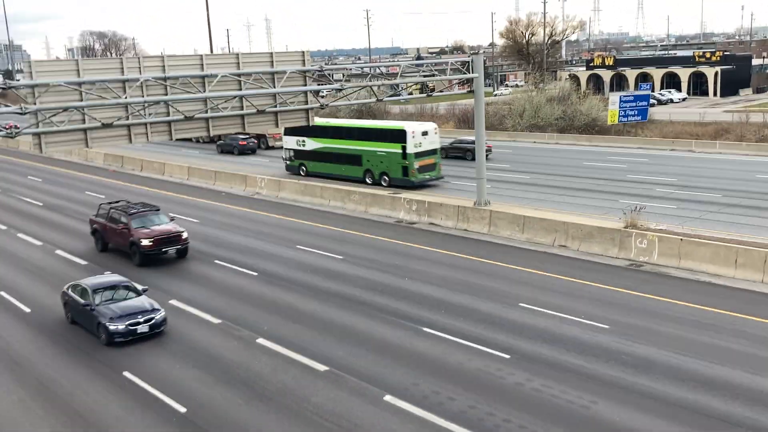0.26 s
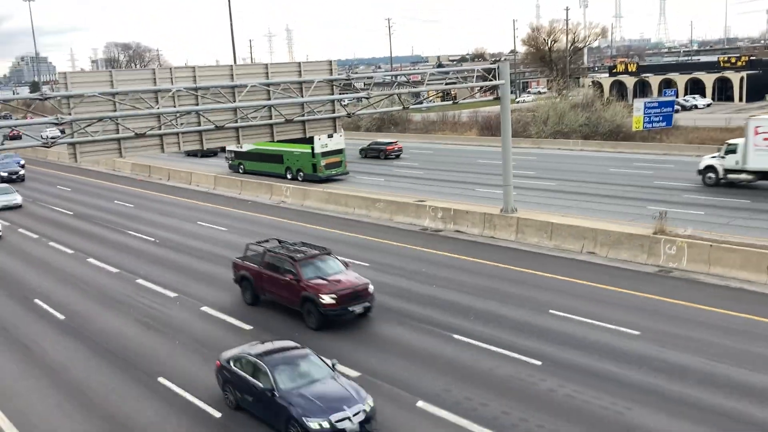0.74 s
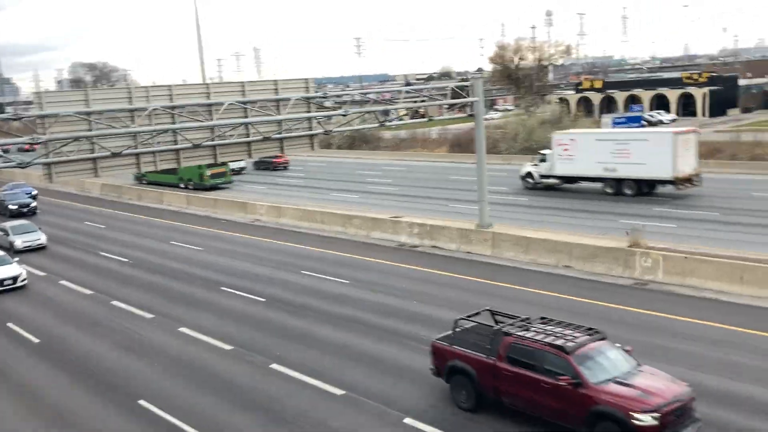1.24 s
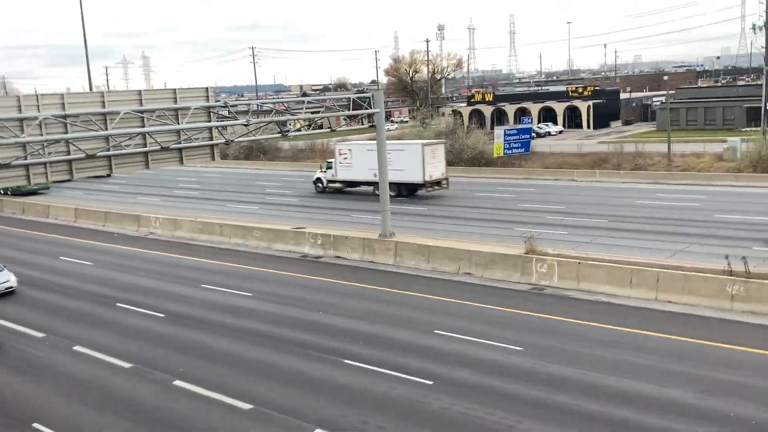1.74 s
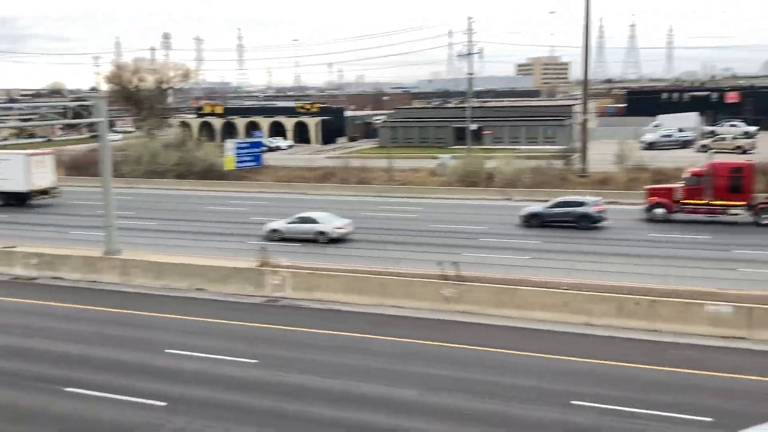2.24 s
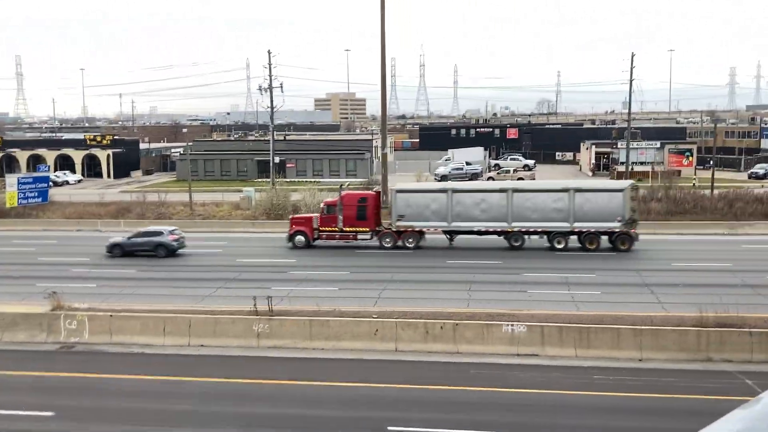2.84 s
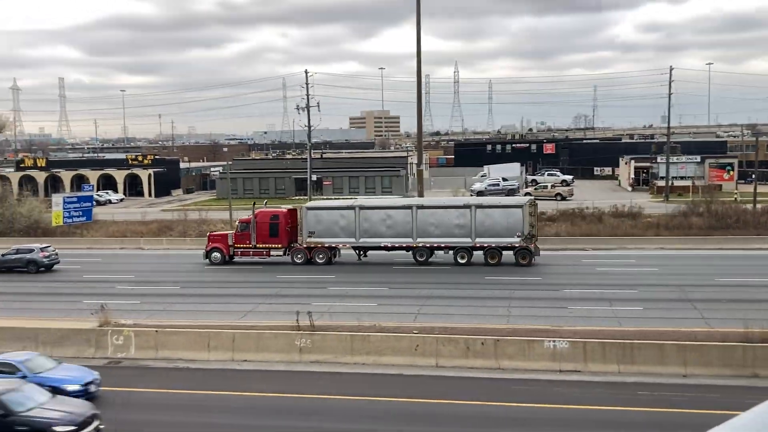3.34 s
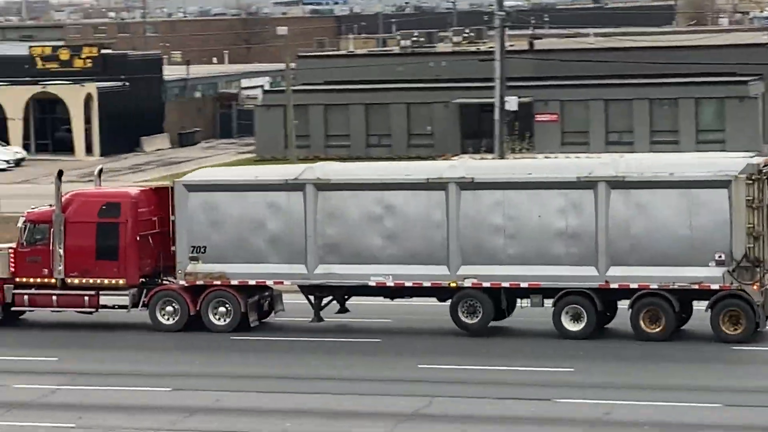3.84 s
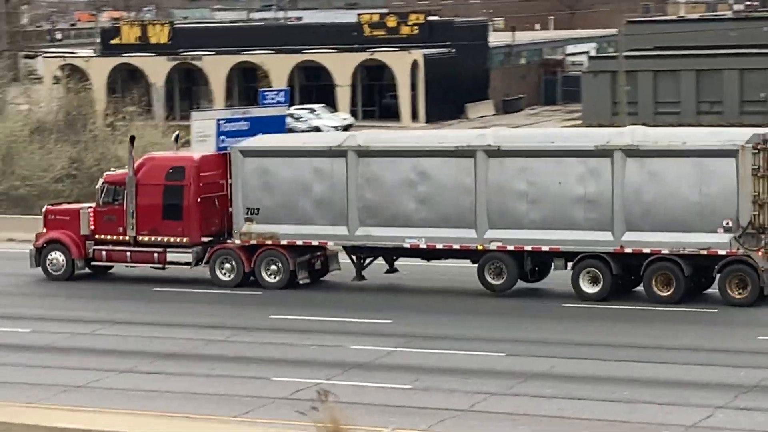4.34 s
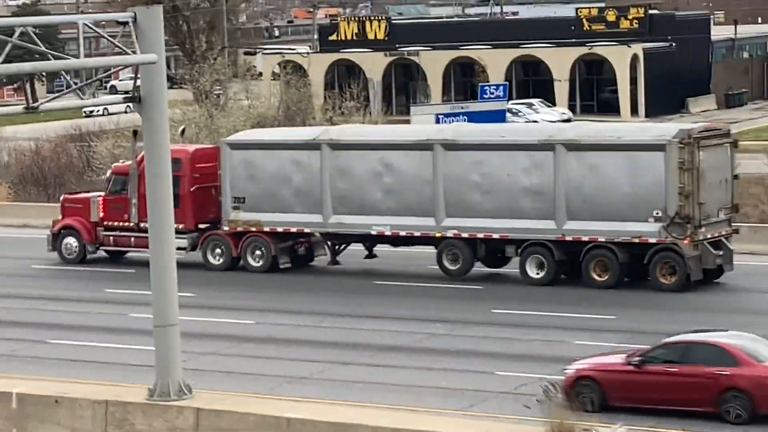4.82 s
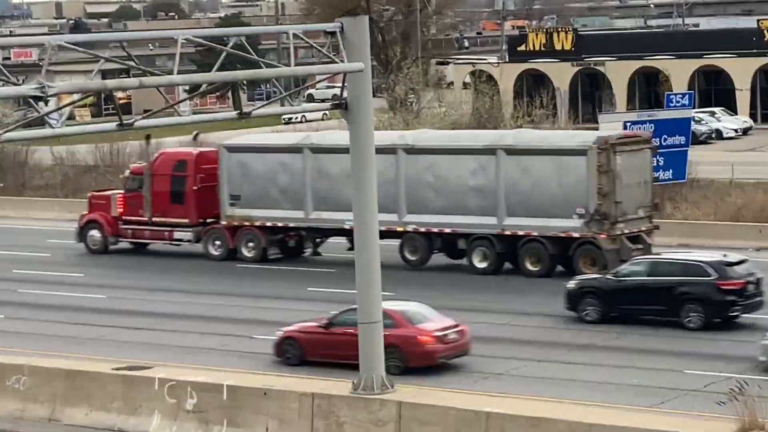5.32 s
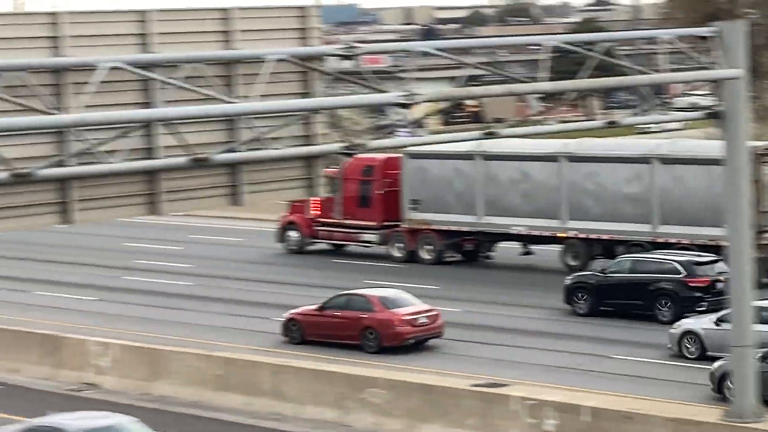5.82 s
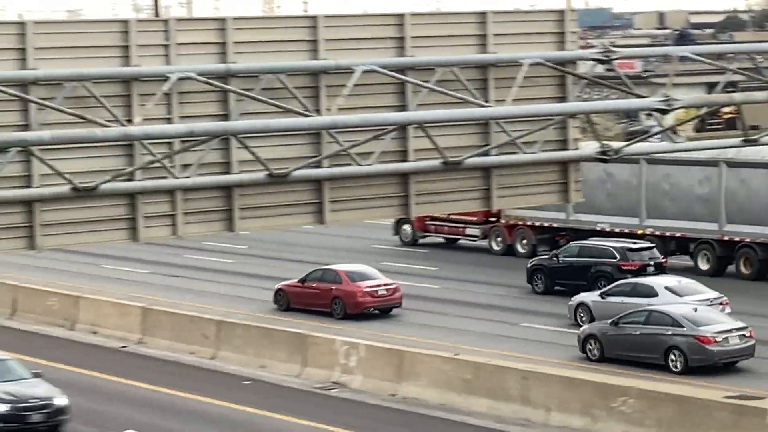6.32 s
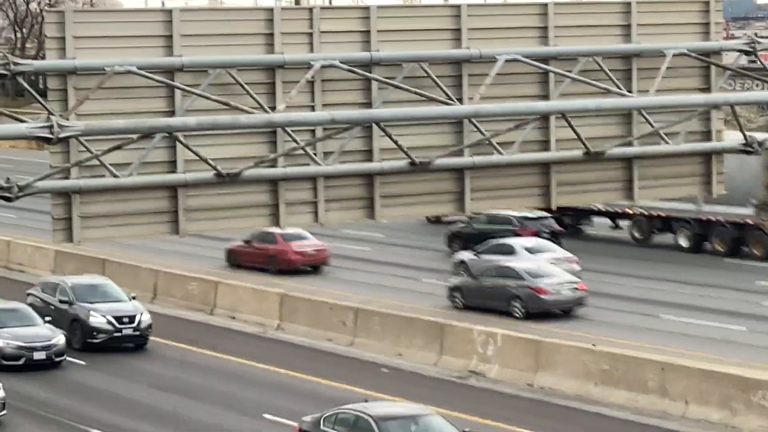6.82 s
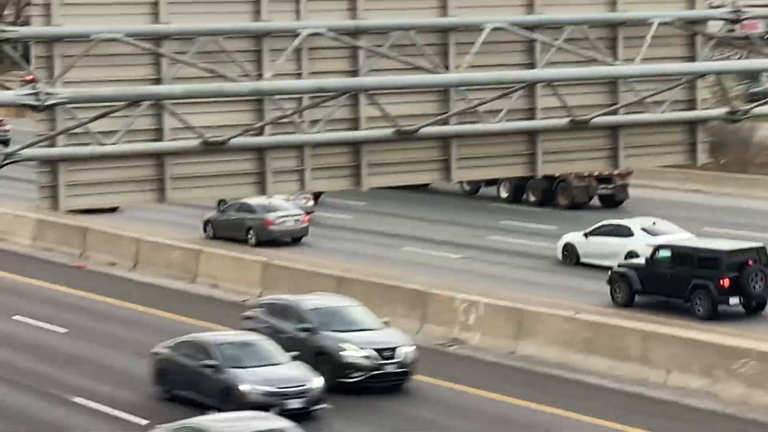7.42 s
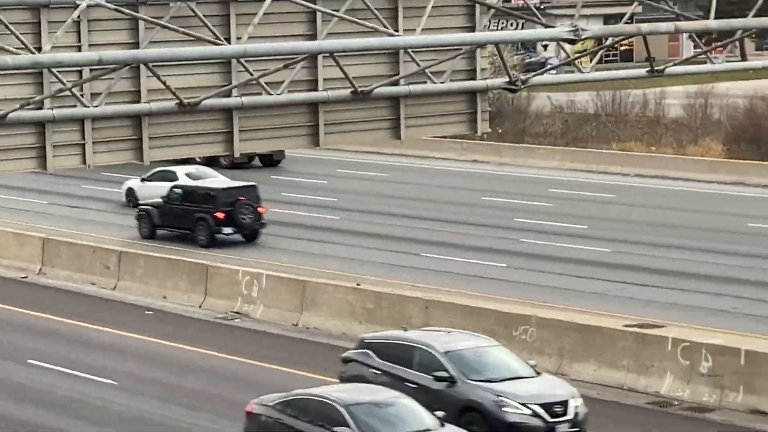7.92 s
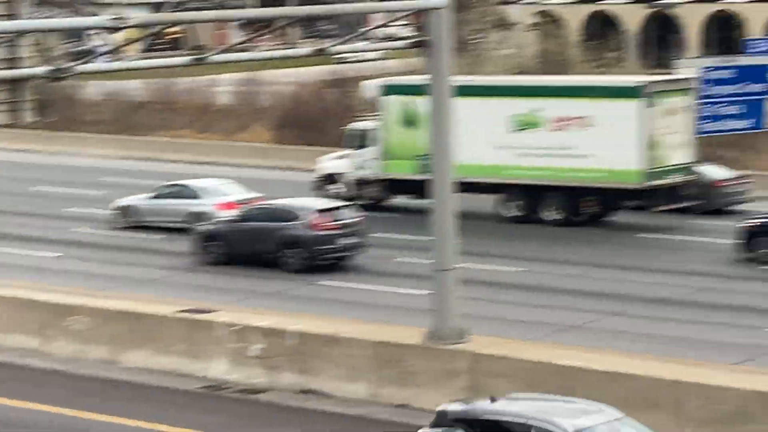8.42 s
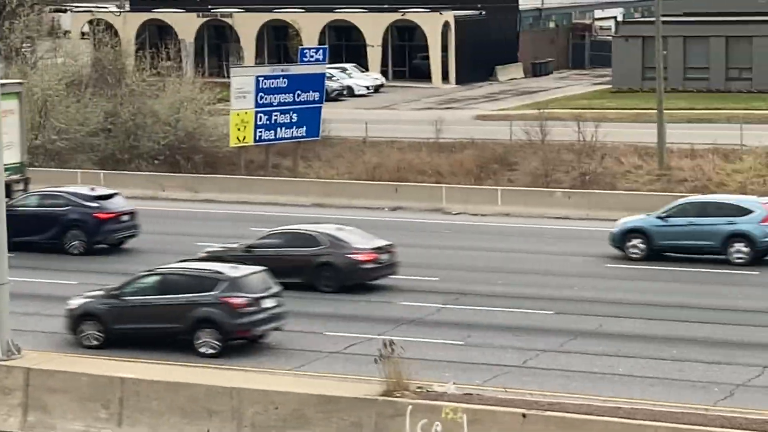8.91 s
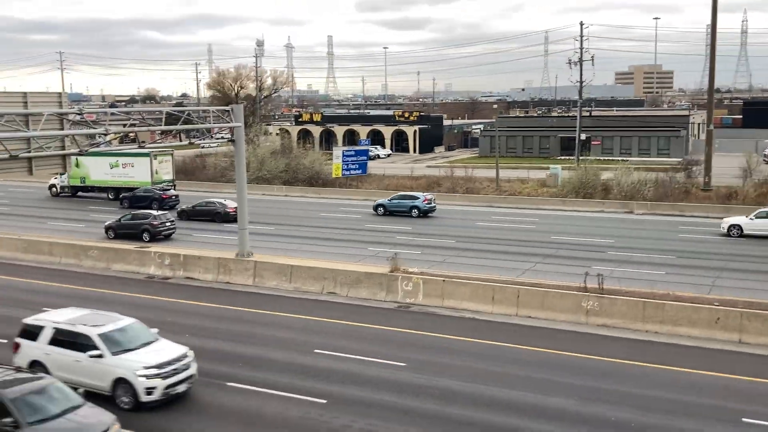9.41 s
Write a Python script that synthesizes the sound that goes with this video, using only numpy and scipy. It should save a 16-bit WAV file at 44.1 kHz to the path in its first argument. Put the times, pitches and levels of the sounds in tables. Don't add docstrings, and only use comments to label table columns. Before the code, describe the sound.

Many tyres hiss and drone along a wide highway while wind buffets the microphone, with crackling ticks and heavy low thumps.

```python
import sys
import numpy as np
from scipy import signal
from scipy.fft import rfft, irfft, next_fast_len
from scipy.io import wavfile
from scipy.ndimage import uniform_filter1d, minimum_filter1d

SR = 44100
rng = np.random.default_rng(int(sys.argv[2]) if len(sys.argv) > 2 else 0)


def generate_wav(sig):
    pcm = np.round(np.clip(np.atleast_2d(sig).T, -1, 1) * 32767).astype(np.int16)
    wavfile.write(sys.argv[1], SR, pcm)


def convert_level_to_amplitude(level_db):
    exponent = np.asarray(level_db, float) / 20
    return 10 ** exponent


N = 426006
TIME = np.arange(N) / SR
SIZE = next_fast_len(N + 8192)
FREQ = np.maximum(np.arange(SIZE // 2 + 1) * SR / SIZE, 1.)
LOG_FREQ = np.log(FREQ)

# (time [s], push [dB], turbulence [dB])
GUST = [(0.0, -16.5, -48), (0.67, -30, -54), (1.62, -22.5, -48), (2.0, -25.5, -62), (3.2, -21.5, -55.5),
        (3.4, -20, -40.5), (3.65, -20.5, -51.5), (4.15, -11, -36), (4.5, -18.5, -47), (5.45, -21, -52.5),
        (6.13, -16.5, -40.5), (6.35, -24, -52.5), (6.97, -24, -55.5), (7.3, -17, -37), (7.45, -29, -55.5),
        (8.35, -28.5, -56.5), (9.2, -15, -37), (9.66, -24, -44)]


def along(table):
    s, *columns = np.transpose(table)
    return [np.interp(TIME, s, column) for column in columns]


def across(table):
    hz, value = np.transpose(table)
    return np.interp(LOG_FREQ, np.log(np.maximum(hz, 1.)), value)


def shape(x, response):
    return irfft(rfft(x, SIZE) * response, SIZE)[..., :N]


def colour(table):
    gain = convert_level_to_amplitude(across(table))
    return gain / np.sqrt(np.mean(gain ** 2))


def peak_one(response):
    return response / np.max(np.abs(irfft(response, SIZE)))


def bell(length_s):
    return np.exp(-(np.pi * FREQ * length_s) ** 2) * length_s * SR * np.sqrt(np.pi)


def unit(x):
    return x / np.sqrt(np.mean(x ** 2))


def white():
    return rng.standard_normal(N)


def walk(rate_hz):
    hold = int(SR / rate_hz)
    held = np.repeat(rng.standard_normal(N // hold + 1), hold)
    slewed = uniform_filter1d(uniform_filter1d(held, hold), hold)[:N]
    return slewed / np.std(slewed)


def lumpy(depth_db, rate_hz):
    return unit(white() * convert_level_to_amplitude(depth_db * walk(rate_hz)))


def spikes(times_s, sizes):
    x = np.zeros(N)
    np.add.at(x, np.clip((times_s * SR).astype(int), 0, N - 1), sizes)
    return x


def swell(times_s, half_s, sizes):
    coarse = TIME[::64]
    humps = 0
    for t, half, size in zip(times_s, half_s, sizes):
        humps = humps + size * np.exp(-((coarse - t) / max(half, .005)) ** 2)
    return np.interp(TIME, coarse, humps)


def wide(make, lean):
    # (frequency [Hz], side minus mid [dB])
    width = [(450, -95), (600, -69.5), (780, -27), (1100, -9), (1600, -4), (2600, 2), (4000, -1),
             (7000, -1)]
    mid, other = make(), make()
    side = shape(other + lean * mid, convert_level_to_amplitude(across(width)))
    return np.array([mid + side, mid - side])


def ports(x):
    # (frequency [Hz], left port leads [rad])
    lead_rad = [(0, 0), (1030, 0.1), (1980, -0.6), (3010, 2.7), (4390, -0.7), (5170, -3.2), (5940, -4.3),
                (6550, -6.2), (7490, -6.5), (7920, -7.9), (9560, -9.9), (10900, -12.2), (12200, -13.0),
                (12500, -13.9), (15800, -6 * np.pi)]
    turn = np.exp(.5j * across(lead_rad) * (FREQ > 2500))
    return np.array([shape(x, turn), shape(x, np.conj(turn))])


def chirp(turns=0.9096):
    return np.exp(-2j * np.pi * turns * np.log2(np.clip(FREQ, 40, 3000) / 3000))


def road():
    # (time [s], traffic flow [dB], closeness of the nearest tyres [dB])
    traffic = [(0.0, -28.5, -11), (0.73, -30, -2.5), (1.32, -27, -11.5), (1.72, -26, -12), (2.3, -31.5, -9),
               (2.91, -31, -4), (3.95, -29.5, -4), (4.49, -29.5, -5), (4.87, -27, -3), (5.24, -31, -4),
               (5.57, -25, -7), (5.89, -33, -3.5), (6.54, -28, -1.5), (7.3, -27, -5), (7.91, -26, -3.5),
               (8.74, -29, -0.5), (9.66, -31, -5)]
    # (time [s], level at the closest point [dB], time to fade by 3 dB [s])
    trucks = [
        (0.0, -35, -1.5),
        (1.4, -27.5, .5),
        (2.7, -34, 0.9),
        (4.05, -32.5, 0.32),
        (4.87, -39, 0.5),
        (6.0, -33.5, -1.8),
        (7.9, -32, 0.8),
        (9.3, -21.5, 0.1),
    ]
    # (frequency [Hz], density [dB/Hz])
    roar_spectrum = [(400, -51), (560, -14.5), (660, -0.5), (850, 0), (1000, -11.5), (1250, -24),
                     (1600, -22), (2600, -120)]
    hiss_spectrum = [(590, -9), (1000, 2.5), (1600, -8), (1980, -4.5), (2280, -7.5), (2800, -10),
                     (3480, -36), (5130, -57.5), (7500, -70), (9750, -90), (16500, -120)]
    drone_spectrum = [(200, -69), (300, -11.5), (450, -8.5), (600, 1), (680, -3.5), (900, -61.5),
                      (1200, -120)]

    flow_db, close_db = along(traffic)
    power = sum(convert_level_to_amplitude(db) ** 2 / (1 + ((TIME - s) / fade_s) ** 2) for s, db, fade_s in trucks)
    drone_db = 10 * np.log10(power) + 1.6 * walk(5.7)
    roar_db = flow_db + .5 * walk(9.3) + 1.0
    hiss_db = flow_db + close_db + walk(12) - 0.1

    def tyres():
        roar = convert_level_to_amplitude(roar_db) * shape(lumpy(0.34, 40), colour(roar_spectrum))
        hiss = convert_level_to_amplitude(hiss_db) * shape(lumpy(2.47, 60), colour(hiss_spectrum))
        return roar + hiss

    drone = convert_level_to_amplitude(drone_db) * shape(lumpy(1.6, 35), colour(drone_spectrum))
    return drone + wide(tyres, 0.067)


def ticks(per_s=240, scatter_db=7.5, length_s=0.00041):
    # (time [s], peak above 8 kHz [dB], body at 3-7
    # kHz [dB])
    loud_ticks = [(0.129, -38, -32.5), (0.1645, -33.5, -41.5), (0.267, -44, -49), (0.2896, -32.5, -43),
                  (0.3384, -38, -43), (0.362, -31, -42.5), (0.3708, -31.5, -45.5), (0.398, -34, -45),
                  (0.4212, -30.5, -49.5), (0.5282, -42, -51), (0.545, -36.5, -50), (0.5766, -43, -53.5),
                  (0.6536, -39, -49.5), (0.6873, -41, -48.5), (0.7997, -46, -54), (0.8, -40, -47.5),
                  (0.83, -51, -50), (0.836, -45, -47), (0.8719, -48, -47), (0.89, -42, -49),
                  (1.165, -37, -47.5), (1.047, -45, -45), (1.072, -37, -43), (1.098, -39, -48),
                  (1.098, -29.5, -51), (1.1443, -47, -52), (1.1445, -31.5, -51), (1.1984, -32, -41),
                  (1.1997, -28.5, -42.5), (1.25, -31, -42.5), (1.257, -25, -51), (1.273, -20, -44.5),
                  (1.317, -37, -57.5), (1.3488, -41, -56), (1.366, -40, -52.5), (1.39, -47.5, -44.5),
                  (1.225, -35, -50), (1.29, -40, -49), (1.4555, -37, -46), (1.5085, -41, -53),
                  (1.51, -41.5, -46), (1.514, -34, -44.5), (1.533, -27.5, -35), (1.579, -38.5, -39.5),
                  (1.601, -35, -48), (1.6183, -25, -40), (1.636, -30.5, -35), (1.732, -37, -51),
                  (1.8336, -47, -49), (1.8532, -44, -47.5), (1.8532, -41, -46), (1.913, -36, -43),
                  (1.9109, -33, -36.5), (1.963, -47, -44.5), (1.9626, -33, -48), (2.16, -30, -35.5),
                  (2.259, -33, -43.5), (2.2817, -46, -63), (2.3301, -44, -57), (2.37, -40, -65),
                  (4.2027, -33, -23), (4.2222, -43, -23.5), (4.2424, -50, -30), (4.284, -34, -23.5),
             (4.332, -43, -38), (4.3697, -49, -37.5), (4.4197, -32.5, -28.5), (4.4677, -42, -37),
             (4.501, -51.5, -51), (4.5208, -45, -41.5), (4.5599, -47, -40), (4.56, -44, -38.5),
             (4.578, -41, -32), (4.6072, -37, -32), (4.6091, -27, -30), (4.627, -40.5, -37),
             (4.6478, -48, -40), (4.661, -39, -35), (4.7017, -46, -45.5), (4.723, -38, -40.5),
             (4.8172, -38, -26.5), (4.84, -44, -45), (4.846, -45, -36.5), (4.887, -33, -28.5),
             (4.92, -34, -28.5), (4.943, -44, -30), (4.9859, -53, -34), (5.036, -44, -23),
             (5.0356, -25, -23), (5.062, -17.5, -11), (5.156, -59, -45), (5.1877, -52, -52),
             (5.343, -55, -53), (5.398, -55, -52), (5.4214, -54, -41), (5.534, -34, -27.5),
             (5.606, -42, -30), (5.605, -27.5, -27), (5.696, -30.5, -33), (5.772, -52, -31),
             (5.91, -54, -38), (5.9402, -53, -34), (5.94, -45, -27.5), (6.1255, -51, -32),
             (6.1518, -50, -42),
                  (6.154, -50, -37.5), (6.1864, -17, -20), (7.32, -34, -32), (6.2322, -28.5, -33),
              (6.2581, -34, -37), (6.2998, -36, -41), (7.089, -38, -48), (6.3404, -36, -53),
              (6.3608, -30.5, -39), (6.4465, -47, -46), (6.4707, -38, -48.5), (6.4901, -43, -51.5),
              (6.788, -28, -46), (6.534, -46, -58), (6.635, -37, -50), (6.6563, -34, -44),
              (6.679, -42, -49), (6.7243, -34, -46), (6.7477, -31, -43.5), (6.7802, -16.5, -40),
              (6.8052, -25, -45.5), (6.8298, -39, -46.5), (6.908, -33, -39.5), (6.864, -30, -47),
              (6.8816, -25, -35), (6.931, -36, -39), (6.952, -44, -55.5), (6.9904, -42, -40),
              (6.9993, -29, -44), (7.029, -42, -49.5), (7.0635, -39, -44.5), (7.078, -39, -48),
              (7.1, -40, -49), (7.1226, -32, -38), (7.14, -26, -39.5), (7.1512, -20, -41),
              (7.1728, -27, -31.5), (7.2088, -19, -36), (7.2233, -26, -22.5), (7.249, -24, -33),
              (7.268, -25, -30.5), (7.2927, -41, -37), (7.2964, -35, -30.5), (7.3083, -24.5, -24.5),
              (7.35, -45, -38), (7.3656, -24, -30.5), (7.378, -31, -32), (7.5501, -44, -38),
              (7.7025, -37, -31.5), (7.7087, -37, -30), (7.7125, -22, -27), (7.7876, -40, -31),
              (7.85, -46, -50), (7.8656, -38, -40), (7.9508, -36.5, -37.5), (7.9767, -55, -51.5),
              (8.019, -43, -44), (7.388, -34, -35.5), (8.1442, -34, -41)]
    # (time [s], peak at 3-7 kHz [dB])
    flicks = [(0.6866, -49), (1.51, -43), (1.603, -34.5), (1.732, -49), (1.851, -45), (2.658, -35.5),
              (2.695, -44.5), (2.72, -38), (2.744, -38), (2.762, -43), (2.94, -47), (2.7906, -29),
              (2.7953, -37), (2.884, -51), (2.926, -50.5), (2.9956, -58.5), (3.0312, -45), (3.073, -38),
              (3.08, -41), (3.212, -57.5), (3.58, -38.5), (3.833, -47), (3.8906, -35.5), (4.011, -36.5),
              (4.33, -33), (4.56, -41.5), (4.724, -38.5), (5.776, -39.5), (5.912, -41), (6.126, -39),
              (6.4892, -48), (6.7238, -43.5), (7.2273, -33.5), (7.294, -32.5), (7.8505, -45),
              (7.865, -39.5), (5.157, -40.5), (5.19, -41), (7.554, -39), (7.7013, -31), (9.034, -41),
              (8.6784, -49), (8.694, -46), (8.988, -45), (9.008, -44.5), (4.226, -36), (4.297, -28),
              (4.765, -49), (5.123, -36.5), (5.687, -35)]
    # (time [s], half length [s], level over the calm [dB])
    crackle = [
        (0.542, 0.3, 16),
        (1.353, 0.45, 23),
        (1.85, 0.27, 7),
        (4.599, 0.2, 7),
        (5.15, 0.23, 4),
        (6.43, 0.097, 15),
        (7.902, 0.28, 7),
        (7.014, 0.22, 20),
    ]
    # (frequency [Hz], density [dB/Hz])
    top_spectrum = [(7000, -120), (7900, -35.5), (8050, 1), (9000, -5), (11000, -18), (12600, -27),
                    (13500, -28), (15300, -40), (15900, -59), (16500, -120)]
    snap_spectrum = [(400, -41), (1200, 2), (2500, -3.5), (4400, -10), (5400, -14.5), (7500, -29.5),
                     (7900, -27), (8500, -120)]
    air_spectrum = [(7000, -120), (7900, -61), (8050, 4), (9500, -11), (12500, -15.5), (13700, -42),
                    (15000, -21.5), (15900, -51.5), (16500, -120)]
    calm_db, air_db = -75.5, -63.5
    duck = 0.21
    stray_share = 0.56

    full = [(s, peak_db + 2, body_db + 2) for s, peak_db, body_db in loud_ticks]
    faint = [(s, db - 7, db) for s, db in flicks]
    onset, top_db, low_db = np.transpose(full + faint)
    after, weaker = rng.random((len(onset), 2, 2)).T
    s = np.concatenate([onset, *(onset - .004 + .013 * after)]) + 2 * length_s
    loss_db = 3.5 + 12 * weaker
    top_db = np.concatenate([top_db, *(top_db - loss_db)])
    low_db = np.concatenate([low_db, *(low_db - loss_db)])

    place, chance = rng.random((int(per_s * N / SR), 2)).T
    swarm_s = place * N / SR
    spell_db = swell(*np.transpose(crackle))[(place * N).astype(int)]
    crackle_db = calm_db + spell_db - scatter_db * np.log(chance + 1 / 20)

    grit = white()
    top_hits = spikes(s, convert_level_to_amplitude(top_db + 2.5)) + spikes(swarm_s, convert_level_to_amplitude(crackle_db + 3.0))
    low_hits = spikes(s, convert_level_to_amplitude(low_db + 11.0)) + spikes(swarm_s, convert_level_to_amplitude(crackle_db + 2.5))
    top = shape(top_hits, bell(length_s))
    low = shape(low_hits, bell(1.22 * length_s))
    push_db = along(GUST)[0]
    hiss_db = air_db - duck * (push_db + 17.0) + 1.2 * walk(7.4)
    air = convert_level_to_amplitude(hiss_db) * shape(white(), colour(air_spectrum))
    stray_gain = stray_share * np.clip(FREQ / 6000 - 1.4, 0, 1)
    stray = shape(white() * top, colour(top_spectrum) * stray_gain)
    return stray + ports(shape(grit * top, colour(top_spectrum)) + shape(grit * low, colour(snap_spectrum)) + air)


def gusts():
    # (time [s], half length [s], added push [dB], added turbulence [dB])
    blasts = [(0.0, 0.027, -1, 7), (0.13, 0.012, -1, 6), (1.876, 0.037, 6.5, 5), (1.933, 0.033, 5, 12),
              (2.057, 0.027, 8, 13), (2.173, 0.027, 8, 9.5), (2.539, 0.014, -0.5, 9.5),
              (2.773, 0.082, 1.5, 12.5), (2.9, 0.028, -1, 5), (3.263, 0.025, 6.5, 6.5),
              (3.54, 0.055, 6, -1), (4.184, 0.026, 6.5, -1), (4.203, 0.0094, -6, 21),
              (4.615, 0.052, 3.5, 6.5), (4.82, 0.011, 1, 14), (4.947, 0.052, 9, 18),
              (5.055, 0.049, 12.5, 26.5), (5.52, 0.052, 10.5, 13), (5.7, 0.011, 5, 19),
              (5.753, 0.027, 2, 6.5), (5.945, 0.015, -9, 11), (6.106, 0.024, -4, 1),
              (6.889, 0.036, 4.5, 17), (7.382, 0.019, 8.5, 17), (7.55, 0.027, 1, 15),
              (7.72, 0.034, 11, 28.5), (7.88, 0.22, 8.5, 8), (5.26, 0.077, 2.5, 7), (9.218, 0.037, 0, 5),
              (9.446, 0.075, 4, 8), (2.688, .03, -1, 8), (3.13, 0.037, 2, 5), (8.548, .025, -4, 7),
              (8.95, 0.0084, -3, 8), (8.996, 0.011, -8, -1), (9.526, 0.026, -4, 1.5),
              (9.595, 0.046, 7.5, 1)]
    # (time [s], half length [s], turbulence lost [dB])
    lulls = [(0.233, 0.037, 9), (1.693, 0.034, 15), (2.25, 0.057, -5), (2.388, 0.047, 6), (2.852, 0.02, 5),
             (4.794, 0.034, 4), (5.001, 0.01, 15), (5.122, 0.04, 8), (5.56, 0.036, 9), (5.66, 0.03, 7),
             (5.966, 0.016, 4), (6.083, 0.023, 11), (7.488, 0.038, 6), (7.607, 0.031, 2),
             (8.848, 0.27, 1.5), (9.34, 0.032, 3), (9.207, 0.012, 2), (9.313, 0.01, 3), (9.416, 0.0076, 9)]
    # (time [s], half length [s], added flutter [dB])
    flaps = [(1.62, 0.14, 1.5), (2.166, 0.036, 4.5), (2.75, 0.15, -5), (3.44, 0.02, 7.5), (3.609, 0.034, 5),
             (4.154, 0.073, 4), (4.982, 0.024, 5), (5.26, 0.036, 2), (5.553, 0.031, -7), (6.04, 0.013, 1),
             (7.38, 0.027, -3.5), (9.06, 0.054, 4.5), (9.229, 0.013, 10), (9.274, 0.03, 7.5),
             (9.505, 0.065, 9.5)]

    push_db, swirl_db = along(GUST)
    s, half_s, more_push_db, more_swirl_db = np.transpose(blasts)
    lull_db = swell(*np.transpose(lulls))
    flap_db = swell(*np.transpose(flaps))
    push_db = push_db + swell(s, half_s, more_push_db) - 0.2014 * lull_db
    swirl_db = swirl_db + swell(s, half_s, more_swirl_db) - lull_db
    flutter_db = -4 + flap_db + 0.31 * push_db + 0.33 * swirl_db
    rush_db = 1.5 + 0.44 * flap_db + 0.66 * swirl_db
    return push_db, flutter_db, rush_db, swirl_db


def wind(per_s=220, scatter_db=2.5, length_s=0.0023):
    # (frequency [Hz], density [dB/Hz])
    rumble_spectrum = [(15, -41), (25, -22.5), (47, 3), (70, 2), (103, 0), (200, -12), (260, -46),
                       (440, -120)]
    flutter_spectrum = [(60, -61.5), (120, 4), (170, 8.5), (300, 3), (500, -9.5), (900, -37), (1500, -120)]
    rasp_spectrum = [(150, -50.5), (280, -7.5), (500, -1.5), (900, -11), (1400, -15.5), (2600, -57.5),
                     (4000, -120)]
    rush_spectrum = [(400, -80.5), (750, -25.5), (1000, 3.5), (2000, -7.5), (2900, -16.5), (3600, -27.5),
                     (5000, -49), (7000, -120)]
    spray_spectrum = [(1500, -82), (2600, -19), (3200, 4.5), (4600, -2), (5400, -13), (6500, -49.5),
                      (7500, -120)]
    haze_spectrum = [(4000, -67), (5200, -5), (7500, -10.5), (7900, -24), (8500, -120)]

    rumble_db, flutter_db, rush_db, spray_db = gusts()
    place, chance, sign = rng.random((int(per_s * N / SR), 3)).T
    when_s = place * N / SR
    size = convert_level_to_amplitude(-scatter_db * np.log(chance + 0.01))
    eddies = unit(spikes(when_s, size * np.sign(sign - .5))) + 0.57 * white()
    bursts = unit(unit(shape(spikes(when_s, size), bell(length_s))) + 0.56)
    soft_bursts = np.sqrt(bursts)

    rumble = convert_level_to_amplitude(rumble_db) * shape(lumpy(0.47, 12), colour(rumble_spectrum))
    flutter = convert_level_to_amplitude(flutter_db - 1.5) * shape(eddies, colour(flutter_spectrum) * chirp())
    rasp = convert_level_to_amplitude(1.47 * flutter_db + 1.0) * shape(eddies, colour(rasp_spectrum) * chirp())

    def air_noise():
        rush = convert_level_to_amplitude(rush_db - 4.0) * bursts * shape(white(), colour(rush_spectrum))
        spray = convert_level_to_amplitude(spray_db - 7.0) * soft_bursts * shape(white(), colour(spray_spectrum))
        haze = convert_level_to_amplitude(1.146 * spray_db - 15.5) * soft_bursts * shape(white(), colour(haze_spectrum))
        return rush + spray + haze

    return rumble + flutter + rasp + wide(air_noise, 0.079)


def pops(length_s=0.0011, click_db=-6, lead_rad=0.42):
    # (time [s], peak [dB], crack above 1.5 kHz [dB])
    steps = [(0.6, -17, -36), (2.4, -18.5, -37), (3.251, -13, -17), (3.856, -14, -31), (3.941, -13, -28),
             (4.045, -11.5, -29), (4.161, -14, -26), (4.189, -15.5, -13), (4.799, -7.5, -23),
             (5.008, -8, -21), (5.485, -11, -15), (5.604, -16, -15.5), (6.108, -13, -28), (6.153, -17, -30),
             (9.188, -3.5, -24), (9.227, 1.5, -21), (9.316, -12, -32), (9.345, -14, -28), (9.533, -4, -23),
             (3.264, -1.5, -12), (3.34, 1.5, -11), (3.431, -12, -32), (3.894, -0.5, -13), (3.912, -2, -11),
             (3.978, -20, -29), (4.013, -4, -13.5), (4.073, -2.5, -23), (4.12, -6, -15.5),
             (4.243, -7.5, -13), (4.283, -6.5, -15), (4.875, -6, -25), (4.932, -6, -16), (4.956, -2.5, -12),
             (5.697, -8, -7), (5.711, 4, -0.5), (5.749, -1.5, -15), (5.912, -7, -25), (5.938, -6.5, -16.5),
             (6.131, -6.5, -21.5), (7.552, -12, -14), (7.716, 3, -8), (8.994, -7, -18), (9.149, -2, -26.5),
             (9.133, -6, -31), (9.493, -8, -22), (9.263, -1.5, -26), (6.027, -8.5, -30),
             (5.998, -13.5, -17), (3.448, -7.5, -23), (3.478, -10.5, -28), (4.025, -9.5, -24),
             (9.218, -8.5, -27), (9.252, -5.5, -25), (9.395, -1.5, -8.5), (9.437, -2, -8), (9.46, -4, -6.5),
             (9.579, -3, -20)]
    # (frequency [Hz], density [dB/Hz])
    thump_spectrum = [(20, -52), (45, -2), (90, 5.5), (400, -1.5), (1000, -6.5), (1600, -39.5), (3200, -44),
                      (5000, -120)]
    crack_spectrum = [(700, -61), (1300, 0), (2500, -0.5), (3600, -15.5), (4600, -24), (6000, -49.5),
                      (7500, -120)]

    s, peak_db, crack_db = np.transpose(steps)
    thump_response = peak_one(colour(thump_spectrum) * chirp(0.798) * np.exp(1j * lead_rad))
    thump = shape(spikes(s + 0.00049, convert_level_to_amplitude(peak_db - 1.5)), thump_response)
    click_response = peak_one(colour(crack_spectrum) * chirp(1.08))
    click = shape(spikes(s - .001, convert_level_to_amplitude(crack_db + click_db)), click_response)
    burst = shape(spikes(s - .001, convert_level_to_amplitude(crack_db - 8.5)), bell(length_s))
    return thump + click + wide(lambda: burst * shape(white(), colour(crack_spectrum)), 0.47)


def scene():
    return road() + ticks() + wind() + pops()


def band_limit(x):
    return signal.sosfilt(signal.butter(12, 15800, fs=SR, output="sos"), x)


def record(dry, hold_s=0.0016, ceiling=.91):
    k = int(hold_s * SR)
    room = np.minimum(1, ceiling / (np.max(np.abs(dry), axis=0) + 1e-9))
    held = minimum_filter1d(room, 2 * k)
    gain = uniform_filter1d(uniform_filter1d(held, k), k)
    return band_limit(dry * gain)


dry = scene()
out = record(dry)
generate_wav(out)
```